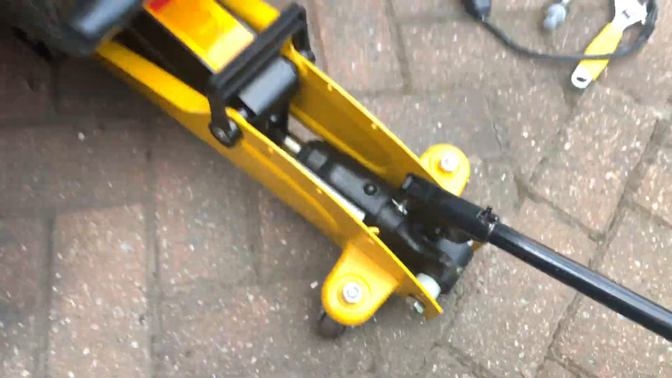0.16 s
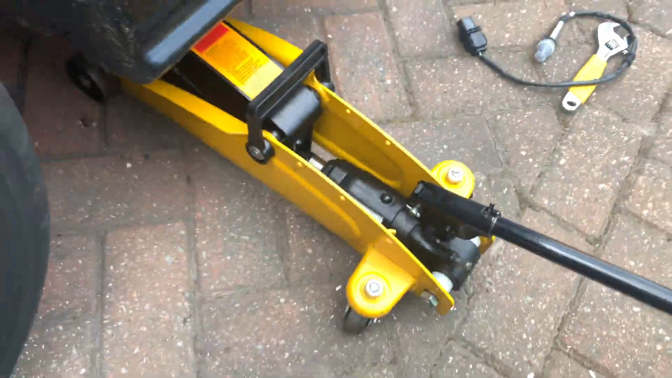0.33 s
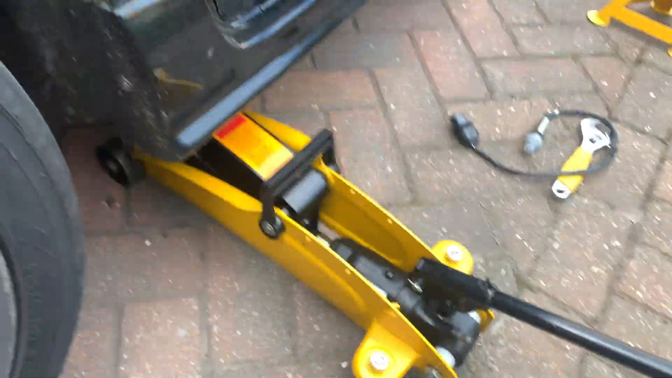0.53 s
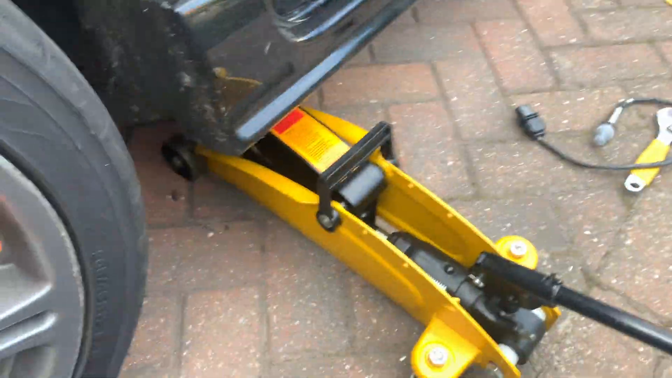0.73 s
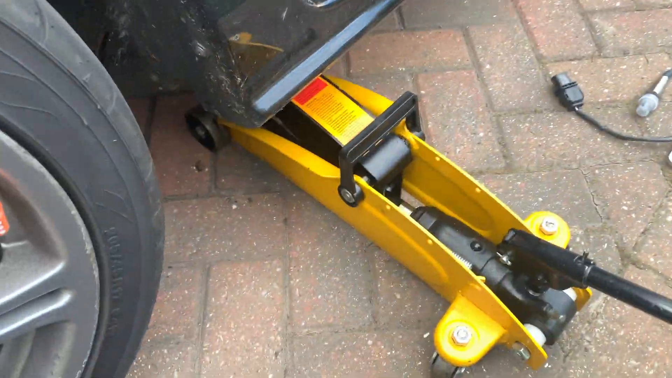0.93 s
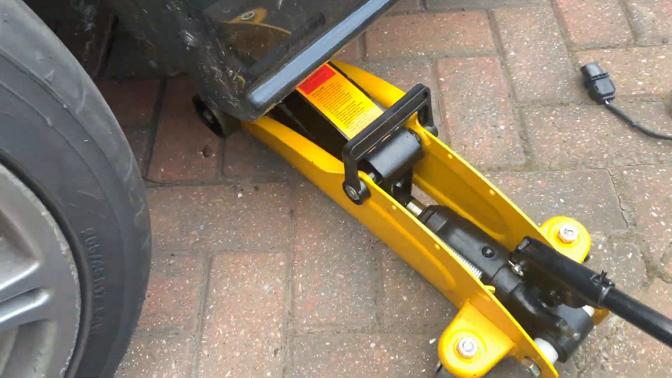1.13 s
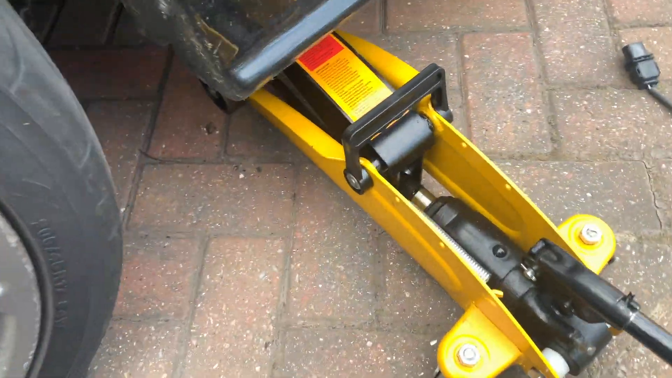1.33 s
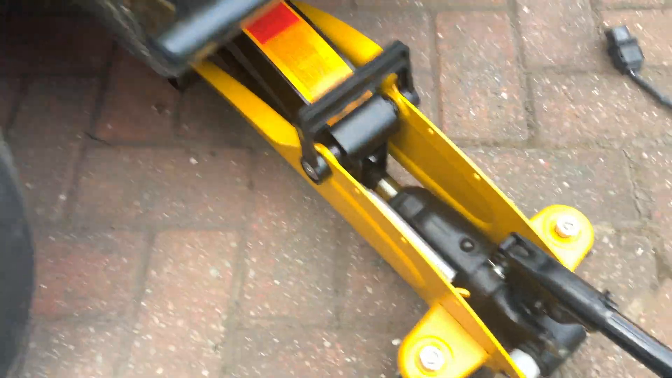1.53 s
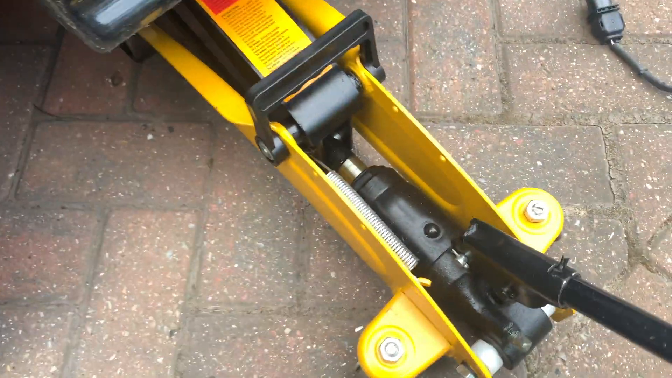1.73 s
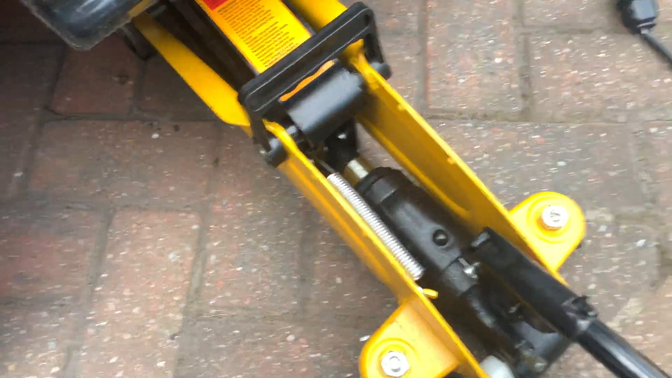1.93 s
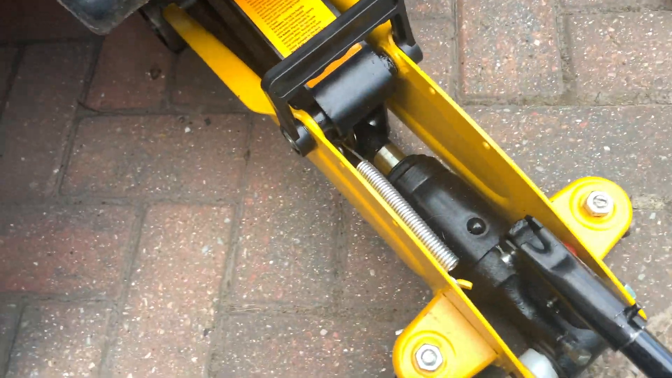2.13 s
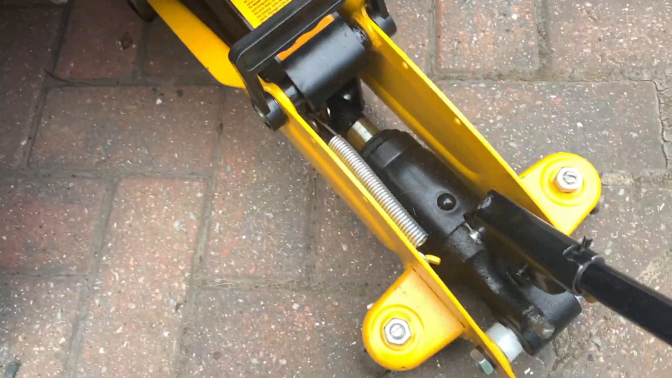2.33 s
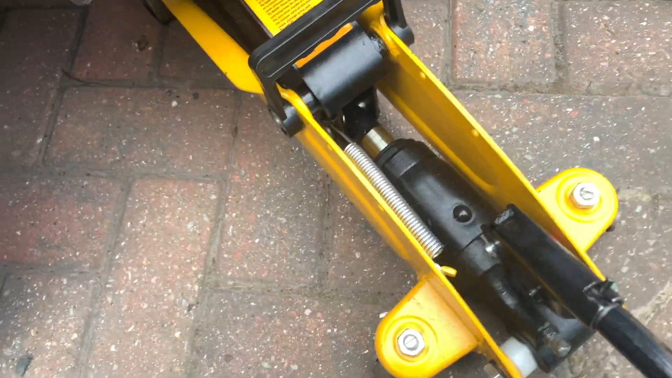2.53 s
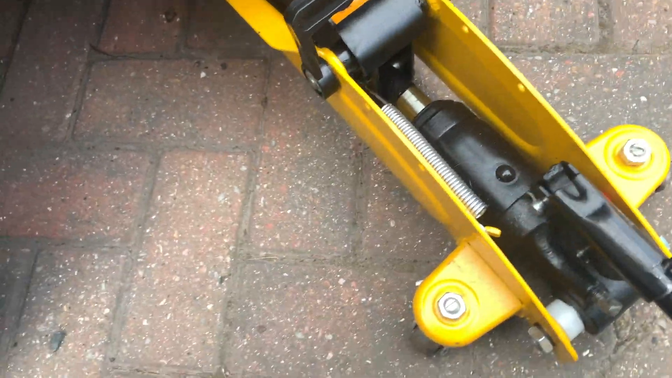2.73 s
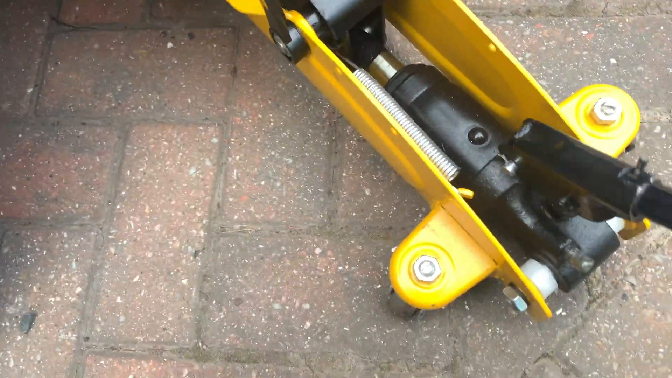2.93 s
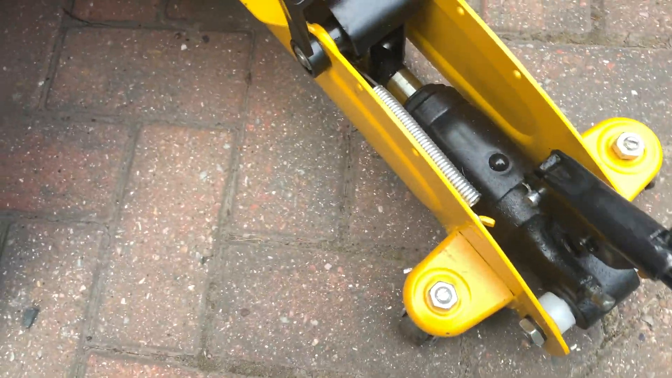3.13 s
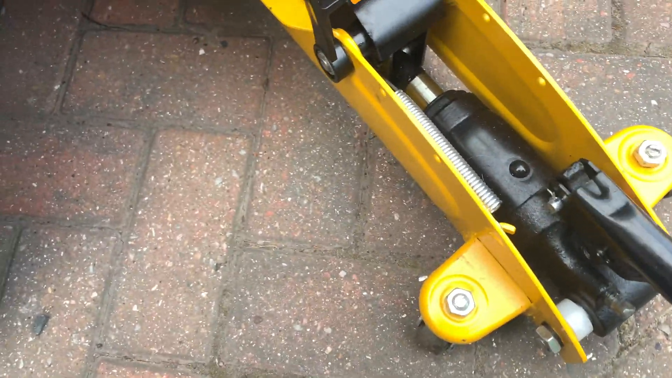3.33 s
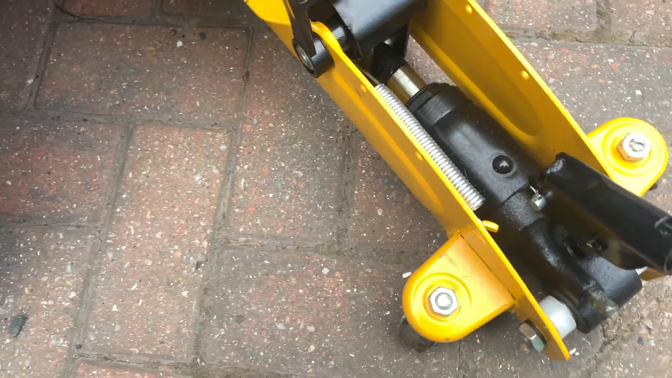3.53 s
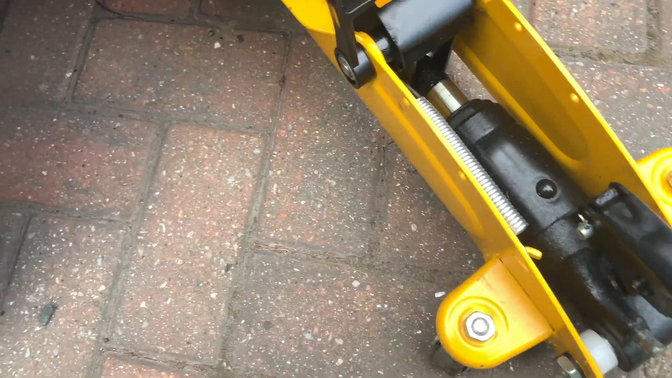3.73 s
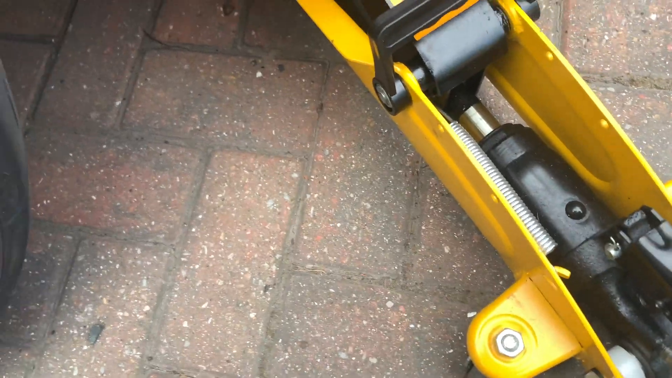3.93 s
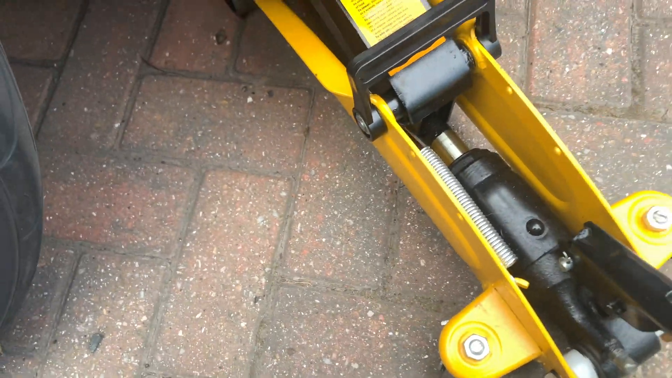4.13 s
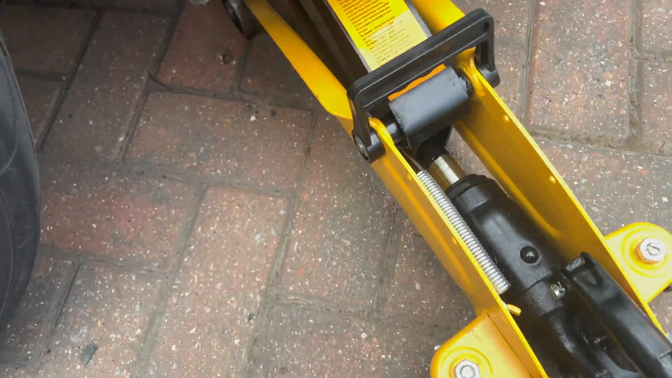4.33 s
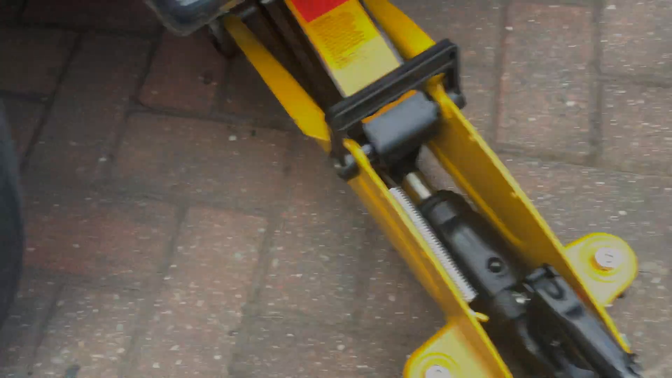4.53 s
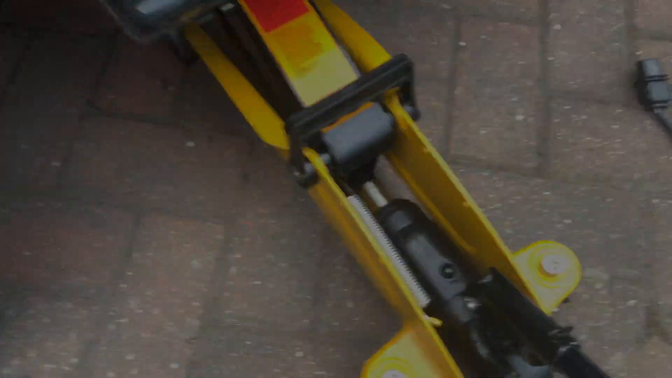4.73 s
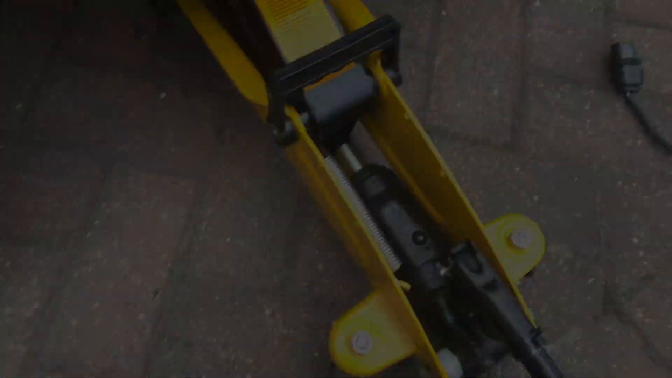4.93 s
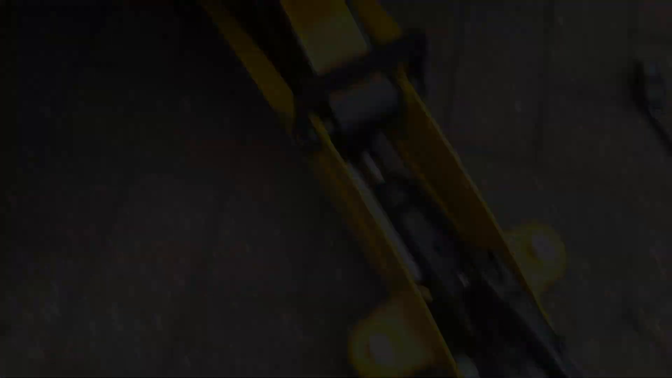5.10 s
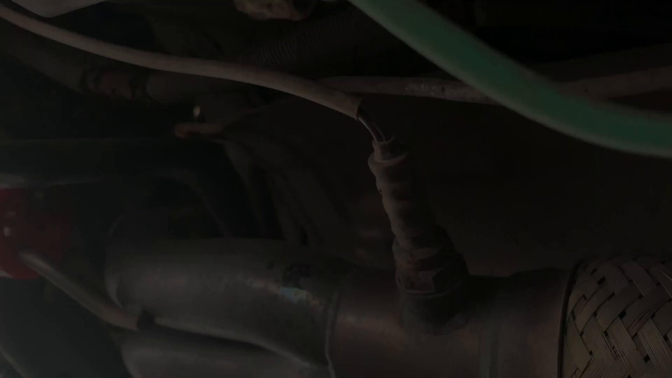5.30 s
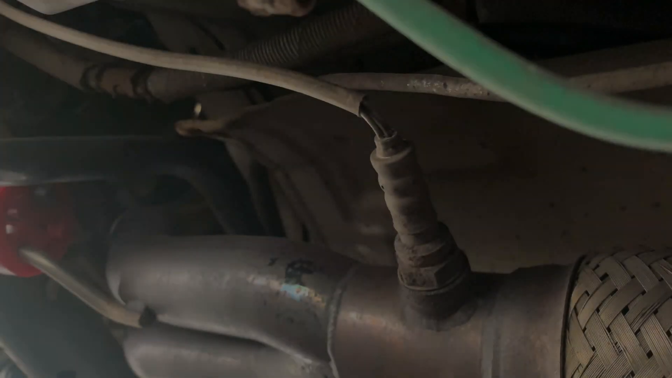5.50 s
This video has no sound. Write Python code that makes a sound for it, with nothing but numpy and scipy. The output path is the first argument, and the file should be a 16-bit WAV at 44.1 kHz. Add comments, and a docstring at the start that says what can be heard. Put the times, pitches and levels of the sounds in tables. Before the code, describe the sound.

A close, dry stereo outdoor sound of a steel trolley jack on block paving. For the first 1.5 s there is only low, uneven wind noise, soft bumps, a thin sliding hiss and a few faint metal ticks. At about 1.5 s pumping begins: six strokes, starting near 1.5, 2.1, 2.8, 3.3, 3.9 and 4.4 s. Each upstroke is a loose, gritty rattle of pins and links, swelling into a tight group of hard, bright clacks, with brief ringing from the handle tube. The frame rumbles beneath, with dull knocks on the paving between roughly 1.8 and 3.1 s. From 3.6 s wind buffets the microphones more strongly with deep, soft thumps. A steady fade starts near 4.45 s, shrinking the last, weaker stroke and its clacks around 4.8 s, reaching silence about 5.26 s. After 5.33 s a very faint low rumble rises again.

```python
"""A steel trolley jack is pumped fast on a paved drive, amid low wind noise at two spaced microphones.
At first sliding hiss and faint clacks are heard; from about 1.5 s six strokes make loose pins and links
clack and chatter, excite the short modes of the frame and the long ones of the handle tube, and make
the frame rumble and knock on the paving. From 3.6 s the wind is stronger. Gain ramps fade the sound
to silence near the end, then a faint rumble rises again."""
import sys
import numpy as np
from scipy import signal
from scipy.io import wavfile
from scipy.ndimage import map_coordinates

SR = 44100
rng = np.random.default_rng(int(sys.argv[2]) if len(sys.argv) > 2 else 0)


def wrap_up_sound(samples):
    """Save the sound to the file named by the first command line argument, as 16-bit audio."""
    columns = np.atleast_2d(samples).T
    # keep every value between -1 and 1, then stretch to whole-number steps
    tamed = np.clip(columns, -1, 1)
    steps = np.round(tamed * 32767).astype(np.int16)
    wavfile.write(sys.argv[1], SR, steps)


N = 245195  # length [samples]
OPPOSED = np.array([[1], [-1]])  # left and right in opposite sign


def amp(db):
    """Decibel law: 20 dB is a factor of ten in amplitude."""
    return 10 ** (np.asarray(db) / 20)


def rms_one(x):
    """Normalisation to unit root-mean-square amplitude."""
    return x / np.sqrt(np.mean(x ** 2) + 1e-20)


def in_time(rows):
    """Linear interpolation of a curve in time, one value per sample."""
    s, *columns = np.transpose(rows)
    return [np.interp(np.arange(N) / SR, s, c) for c in columns]


def at_hz(points, hz):
    """Interpolation of a spectrum on a logarithmic frequency axis."""
    point_hz, values = np.array(points).T
    return np.interp(np.log(hz), np.log(point_hz), values)


def drift(rate):
    """Slow random modulation: Gaussian knots, rate per second, joined by lines; spread about 1."""
    knots = rng.standard_normal(int(N / SR * rate) + 3)
    return map_coordinates(knots, [np.arange(N) * rate / SR], order=1) * np.sqrt(3 / 2)


def ring(x, hz, t60):
    """Damped resonance: a two-pole mode with zeros that restrain it far below and above its pitch."""
    r, w = amp(-60 / (t60 * SR)), 2 * np.pi * hz / SR
    edge = .5 / np.sin(w / 2 + .3)
    return signal.lfilter([edge, 0, -edge], [1, -2 * r * np.cos(w), r * r], x + 1e-18)


def band(x, low_hz, high_hz):
    """Band-pass filtering with a Butterworth response."""
    sos = signal.butter(2, [low_hz, high_hz], "band", fs=SR, output="sos")
    return signal.sosfilt(sos, x + 1e-18)


def place(times, bursts, gains):
    """Superposition: one scaled burst is added at each moment."""
    size = bursts.shape[-1]
    out = np.zeros((2, N + size))
    for s, burst, gain in zip(times, bursts, gains):
        start = round(s * SR)
        out[:, start:start + size] += gain * burst
    return out[:, :N]


def rebounds(shape, per_s, spread_db, fade_s):
    """Repeated impact: uneven random touches, each decaying exponentially with time constant fade_s."""
    sizes = amp(spread_db * np.minimum(rng.exponential(1, shape), 2))
    sizes = sizes * (rng.random(shape) < per_s / SR)
    sizes[..., 0] = 1.6 * amp(spread_db * 2)  # the first touch is the hardest
    return signal.lfilter([1], [1, -np.exp(-1 / (fade_s * SR))], sizes) / amp(spread_db * 2)


# Wind noise before its modulation: (time [s], level [dB])
WIND_LEVEL = [(0, -54.5), (.08, -50.5), (.34, -57.5), (.37, -52), (.94, -60.5), (1.3, -54), (1.86, -55.5),
              (2.07, -52), (2.72, -53), (3.0, -54), (3.3, -48), (3.62, -26.5), (3.7, -38.5), (4.3, -35.5),
              (4.55, -35.5), (5.2, -40.5), (5.4, -62.5), (5.56, -55)]


def wind():
    """Turbulent pressure noise: lumpy low bands, partly incoherent between spaced microphones."""
    level_db, = in_time(WIND_LEVEL)
    mid, side, upper, other = rng.standard_normal((4, N))
    deep = rms_one(band(mid, 44, 100)) + 0.49 * rms_one(band(side, 30, 109.8)) * OPPOSED
    deep = amp(2.0 * drift(14)) * deep
    colour = signal.butter(1, 220, fs=SR)
    upper, other = [rms_one(signal.lfilter(*colour, band(v, 110, 250))) for v in (upper, other)]
    upper = amp(-6.5 + 3 * drift(25)) * (upper + 0.25 * other * OPPOSED)
    return amp(level_db) * (deep + upper)


# Sudden low bumps: (time [s], level before its envelope [dB], reference pitch of the glide [Hz])
LOW_BUMPS = [(0.079, -42.5, 137), (0.36, -34, 110), (0.511, -41.5, 128), (0.683, -39.5, 69.4),
             (1.314, -41, 71), (3.598, -19, 158), (3.654, -21.5, 187.5), (3.853, -19.5, 70.3),
             (4.06, -24.5, 204), (4.226, -20.5, 191.4), (4.317, -20.5, 134), (4.447, -23, 89),
             (4.522, -19.5, 131)]


def bumps():
    """Falling-frequency transients: decaying low swings with a brief overtone, slightly out of phase."""
    s, level_db, hz = np.transpose(LOW_BUMPS)
    t = np.arange(4000) / SR
    glide = 0.84 + 1.0 * np.exp(-t / 0.0069)
    phase = 2 * np.pi * np.cumsum(hz[:, None] * glide, axis=1) / SR
    offset = rng.normal(0, 0.14, (len(s), 1, 1)) * OPPOSED
    overtone = 0.28 * np.exp(-t / 0.06) * np.sin(2.2 * phase[:, None])
    swings = np.sin(phase[:, None] + offset) + overtone
    envelope = (1 - np.exp(-t / 0.00049)) * np.exp(-t / 0.022)
    return place(s, swings * envelope, amp(level_db))


RISE_S, SETTLE_DB_PER_S = .015, 220  # onset and decay of the stroke envelope
# Pump strokes: (handle starts up [s], is raised [s], is down again [s], vigour [dB])
PUMP_STROKES = [(1.492, 1.631, 1.97, -2), (2.087, 2.281, 2.54, 3), (2.758, 2.903, 3.18, -0.3),
                (3.281, 3.467, 3.68, -1.5), (3.918, 4.06, 4.36, -4), (4.411, 4.618, 5.4, -10.5)]


def working(down_share):
    """Envelope of driven motion: quick rise, hold, exponential decay; the way down takes a share."""
    t = np.arange(N) / SR

    def held(until):
        return amp(-SETTLE_DB_PER_S * np.clip(t - until, 0, 1))

    total = 0
    for start, raised, end, vigour_db in PUMP_STROKES:
        rise = np.clip((t - start) / RISE_S, 0, 1)
        hold = (1 - down_share) * held(raised) + down_share * held(end)
        total = total + amp(vigour_db) * rise * hold
    return total


def rumble():
    """Forced vibration: the frame shakes on the paving under each stroke, nearly alike left and right."""
    mid, side = [rms_one(band(v, 48, 210)) for v in rng.standard_normal((2, N))]
    lumps = amp(-42 + 3.5 * drift(30))
    return lumps * working(down_share=0.99) * (mid + .3 * side * OPPOSED)


# Knocks of the frame on the paving: (time [s], level [dB])
FRAME_KNOCKS = [(1.821, -20.5), (2.346, -22.5), (2.395, -24.5), (2.445, -23), (2.874, -24.5), (2.975, -19),
                (3.065, -17.5)]
# Low modes of the frame: (frequency [Hz], relative level [dB], t60 [s])
LOW_MODES = [(143.7, -0.5, 0.14), (219.7, -1, 0.14), (424.4, -12, 0.15), (522, -13, 0.25)]


def thuds():
    """Modal excitation by a soft push: low modes ring, each with a chance phase and strength."""
    s, blow_db = np.transpose(FRAME_KNOCKS)
    t, out = np.arange(12000) / SR, 0
    chance = rng.standard_normal((len(s), len(LOW_MODES), 2))
    for k, (hz, level_db, t60) in enumerate(LOW_MODES):
        tones = np.sin(2 * np.pi * (hz * t + chance[:, k, :1]))
        rings = tones * amp(-60 * t / t60) * (1 - np.exp(-t / 0.01225))
        # one tone per knock, alike in both channels
        out = out + place(s, rings, amp(blow_db + level_db + 2.2 * chance[:, k, 1]))
    return out


# Left-right likeness: (frequency [Hz], correlation [0 to 1])
COHERENCE = [(300, 0.071), (800, 0.093), (2000, 0.33), (5000, 0.037)]


def spread(pair, hz):
    """Interchannel coherence: sum and difference of two unrelated signals give a set likeness."""
    alike = np.clip(at_hz(COHERENCE, hz), 0, 1)
    return np.sqrt(1 + alike) * pair[0] + np.sqrt(1 - alike) * pair[1] * OPPOSED


SLIDE_DB, PUSH_SHARE = -3, 0.25  # added hiss under a stroke; its share on the way down
BRIGHTEN = 0.52  # louder sliding is brighter: dB per octave up to 4 kHz for each dB of level
# Sliding hiss before its swell under a stroke: (time [s], level [dB])
SCRAPE_LEVEL = [(0, -62), (.45, -58), (.8, -67), (.94, -62.5), (1.05, -57.5), (1.39, -60.5), (1.41, -57),
                (1.49, -49), (1.55, -51.5), (1.9, -54.5), (2.7, -56.5), (3.9, -55), (4.4, -53),
                (5.2, -56.5), (5.3, -70.5), (5.56, -77)]
# Spectrum of the hiss: (frequency [Hz], relative density [dB])
SCRAPE_SPECTRUM = [(300, -7), (603, 3.5), (689, -2), (1660, -1), (2650, -7), (3890, -7.5), (14000, -40),
                   (16000, -69.5)]


def scrape():
    """Friction noise: sliding hiss with fine ticks, fluctuating from band to band."""
    level_db, = in_time(SCRAPE_LEVEL)
    moving = working(PUSH_SHARE)
    touches = rebounds(N, per_s=90, spread_db=-2.0, fade_s=0.001)
    ticks = 0.9 + np.minimum(moving + .15, 1) * touches
    white = ticks * rng.standard_normal((2, 2, N))
    out, together = 0, drift(26)
    brighter_db = BRIGHTEN * (level_db - level_db.mean())
    edges = 300 * 2 ** np.arange(0, 5.8, .25)  # quarter-octave bands
    for k, (low_hz, high_hz) in enumerate(zip(edges, edges[1:])):
        hz = np.sqrt(low_hz * high_hz)
        patches_db = 2.5 * drift(20) + 1.5 * together
        tilt_db = brighter_db * np.log2(min(hz, 4000) / 1000)
        gain = amp(at_hz(SCRAPE_SPECTRUM, hz) + patches_db + tilt_db)
        out = out + gain * spread(band(white[k % 2], low_hz, high_hz), hz)
    return amp(level_db) * (1 + amp(SLIDE_DB) * moving) * rms_one(out)


# Blows that leave the handle ringing: (time [s], level [dB], added level of modes above 2 kHz [dB])
HANDLE_BLOWS = [(1.227, -50, -5), (1.51, -34.5, 2), (1.611, -29, -22.5), (1.829, -27, 0.5),
                (2.388, -21.5, -4.5), (2.901, -35, 0.5), (2.9769, -23, 1.5), (3.0753, -21.5, -3),
                (3.533, -12.5, -12.5), (3.652, -21.5, 4), (4.032, -32.5, -4.5), (4.2218, -19, -9.5),
                (4.815, -36, -11)]
# Long modes of the handle tube: (frequency [Hz], relative level [dB], t60 [s])
HANDLE_MODES = [(1791, -9, .24), (5055, -17, .2), (3720, -23, .25), (995, -20, .14), (2662, -24, .2),
                (3080, -23, .13), (4215, -29, .25), (5739, -25, .09)]


def handle():
    """Free vibration: a soft blow sets the tube's modes ringing, with another phase at each microphone."""
    s, blow_db, upper_db = np.transpose(HANDLE_BLOWS)
    t, out = np.arange(12000) / SR, 0
    for hz, level_db, t60 in HANDLE_MODES:
        phase = rng.uniform(0, 2 * np.pi, (len(s), 2, 1))
        tones = np.sin(2 * np.pi * hz * t + phase)
        rings = tones * amp(-60 * t / t60) * (1 - np.exp(-t / 0.0016))
        chance_db = 1.3 * rng.standard_normal(len(s))
        out = out + place(s, rings, amp(blow_db + level_db + (hz > 2000) * upper_db + chance_db))
    return out


def rattle(count):
    """Random impacts of loose links, spread over each upstroke: rows with the columns of the contacts."""
    start, raised, _, vigour_db = np.transpose(PUMP_STROKES)[..., None]
    when, strength, pitch = rng.random((3, len(PUMP_STROKES), count))
    s = start + (raised - start) * (np.arange(count) + when) / count
    same = np.ones(s.shape)
    level_db = -32 + vigour_db + 6 * strength
    treble_db, t60 = -18 * same, .05 * same
    return np.transpose([s, level_db, treble_db, t60, 700 * 5 ** pitch]).reshape(-1, 5)


LOW_DB, LOW_DB_PER_OCTAVE = -4, -5.5  # low modes of a contact favouring 1500 Hz; higher ones have less
LEAD_IN_S, LEAD_IN_DB = .006, -11  # parts graze briefly before the full contact
# Clear metal contacts: (time of full contact [s], drive level [dB], added treble level [dB],
# chatter t60, held to 0.01-0.25 [s], favoured frequency [Hz])
CONTACTS = [(0.071, -40.5, -60, 0.099, 2260), (0.105, -35.5, -19, 0.042, 2440),
            (0.358, -36.5, -41, 0.012, 1080), (0.507, -42, 5, 0.019, 613), (0.678, -46, -40, 0.2, 690),
            (1.163, -42, -9, 0.37, 4460), (1.221, -25, -59, 0.14, 2680), (1.398, -33.5, 0.5, 0.078, 5630),
            (1.499, -31.5, -40, 0.075, 1510), (1.513, -12, -33, 0.11, 1850), (1.549, -25, -17, 0.029, 3020),
            (1.581, -18, -8, 0.0097, 2560), (1.567, -23.5, 9.5, 0.081, 3080),
            (1.611, -5, -8.5, 0.019, 4500), (1.617, -14, 3.5, 0.016, 1900), (1.708, -18, -5.5, 0.14, 2860),
            (1.725, -17.5, -2, 0.085, 2000), (1.791, -4, -4.5, 0.052, 2920), (1.812, -13, -3, 0.14, 2250),
            (1.829, -11.5, -23, 0.12, 1400), (2.087, -22.5, -46, 0.0092, 1440),
            (2.097, -27, -6, 0.007, 4900), (2.106, -23.5, -22, 0.28, 980), (2.146, -24.5, 1, 0.16, 1460),
            (2.171, -32, 1, 0.075, 1540), (2.181, -12.5, -17, 0.09, 6300), (2.198, -9, 1, 0.013, 4763),
            (2.219, -20.5, -12, 0.092, 2610), (2.246, -29, 9, 0.062, 1780), (2.276, -25, 5, 0.016, 4340),
            (2.327, -5, -14.5, 0.11, 4100), (2.377, -2.5, -4, 0.078, 3160), (2.427, -4, -4, 0.089, 2730),
            (2.452, -12, -41, 0.063, 1284), (2.703, -35.5, -18, 0.39, 1680), (2.769, -18, -31, 0.025, 1380),
            (2.829, -44, -20, 0.025, 810), (2.844, -16, 11, 0.022, 1940), (2.868, -11, -12, 0.025, 4440),
            (2.891, -18.5, 10.5, 0.022, 3100), (2.969, -9, -4, 0.088, 2750),
            (3.028, -6.5, -3.5, 0.11, 2990), (3.046, -5, -5, 0.091, 3380),
            (3.066, -6.5, -21.5, 0.052, 1306), (3.287, -35.5, -22, 0.087, 1455),
            (3.321, -35, -32, 0.084, 1490), (3.340, -20.5, -5, 0.035, 5500),
            (3.346, -21.5, -25, 0.093, 1390), (3.363, -15.5, -19, 0.029, 5300),
            (3.393, -20.5, -11, 0.23, 3250), (3.413, -14.5, 11, 0.022, 3240), (3.448, -18, 1, 0.04, 4100),
            (3.457, -12, -9.5, 0.029, 4100), (3.531, -8, -7.5, 0.15, 1800), (3.614, -5, 1, 0.096, 3210),
            (3.625, -3.5, -14, 0.076, 4940), (3.65, -1.5, -8, 0.067, 3100), (3.848, -34, -21, 0.43, 4360),
            (3.92, -22, -20.5, 0.067, 1363), (3.973, -21.5, -2, 0.077, 1850),
            (3.989, -14.5, 7.5, 0.034, 1795), (4.025, -9, -5.5, 0.081, 4600), (4.122, -11, -10, 0.1, 2780),
            (4.181, -7, -2, 0.16, 4900), (4.197, -6.5, -5.5, 0.079, 5600), (4.216, -5, -18, 0.094, 2770),
            (4.418, -31.5, -15, 0.053, 3130), (4.453, -25, -25, 0.041, 2820),
            (4.51, -20.5, -21, 0.051, 1374), (4.528, -23.5, -0.5, 0.046, 1805),
            (4.557, -27, -3, 0.053, 1420), (4.567, -18.5, 2, 0.16, 1995), (4.584, -16, 7, 0.023, 3140),
            (4.609, -14.5, -31, 0.06, 4950), (4.725, -32.5, -20, 0.04, 1500), (4.733, -17, -2, 0.047, 2700),
            (4.767, -11, -1.5, 0.049, 2630), (4.779, -11.5, -12, 0.053, 2590), (4.798, -4, -4, 0.019, 4170),
            (4.813, -10.5, -33.5, 0.073, 1022), (5.061, -28.5, -45, 0.062, 1440),
            (5.13, -26.5, -8, 0.07, 3340)]
# Frame modes: (frequency [Hz], bandwidth, at least 40 used [Hz], relative level [dB])
FRAME_MODES = [(725, 32, -10.5), (1428, 99, -6.5), (3133, 110, -12.5), (4635, 520, -9), (6280, 150, -4.5),
               (9900, 120, -3)]
# Envelope of the dense small modes: (frequency [Hz], relative level [dB])
SMALL_MODE_SPECTRUM = [(420, -15.5), (494, -35.5), (725, -17.5), (1150, -22.5), (1750, -21.5),
                       (4990, -27.5), (5700, -26.5), (10200, -13), (11700, -38), (14700, -5.5),
                       (16000, -33)]


def clacks():
    """Impact excitation: each contact, a decaying run of rebounds, drives small modes and frame modes."""
    s, peak_db, high_db, t60, favoured_hz = np.vstack([CONTACTS, rattle(count=18)]).T
    low_db = LOW_DB + LOW_DB_PER_OCTAVE * np.log2(favoured_hz / 1500)
    t = np.arange(5000) / SR
    touch = 1 - np.exp(-t / .0004)
    shape = touch * amp(-60 * t / np.clip(t60, .01, .25)[:, None])
    shape = shape * (0.087 + rebounds(shape.shape, per_s=260, spread_db=3.0, fade_s=0.0013))
    lead = round(LEAD_IN_S * SR)
    graze = amp(LEAD_IN_DB) * np.linspace(0, 1, lead) * rng.random((len(s), 1))
    shape = np.hstack([graze, shape[:, :-lead]])
    starts = np.round((s - LEAD_IN_S) * SR).astype(int)
    runs = shape * rng.choice([-1, 1], (4, *shape.shape))  # random sign per sample, four versions

    # each part radiates from its own spot, so either channel may lag a little
    lags = np.round(np.abs(rng.normal(0, .00022, (len(s), 4))) * SR).astype(int)
    swaps = rng.integers(0, 2, (len(s), 4))
    bursts = []
    for rows in zip(runs, lags.T, swaps.T):
        bursts.append([np.array([run, np.roll(run, lag)])[::1 - 2 * swap]
                       for run, lag, swap in zip(*rows)])

    def struck(k, hz, width_hz, level_db, scatter_db):
        """Modal response: one resonance under all blows, weighted by their spectra and by chance."""
        low = np.interp(np.log(hz), np.log([1000, 2200]), [1, 0])
        high = np.interp(np.log(hz), np.log([4000, 7000]), [0, 1])
        chance_db = scatter_db * rng.standard_normal(len(s))
        # where the blow lands favours some modes
        favour_db = 11 * np.exp(-(np.log(hz / favoured_hz) / 0.12) ** 2) - 4
        gains = amp(peak_db + low * low_db + high * high_db + chance_db + favour_db)
        drive = np.zeros((2, N + len(t)))
        for start, burst, gain in zip(starts, bursts[k % 4], gains):
            drive[:, start:start + len(t)] += gain * burst
        mode_t60 = np.log(1000) / np.pi / width_hz
        return amp(level_db) * (-1) ** k * width_hz / 100 * ring(drive[:, :N], hz, mode_t60)

    out = 0
    small_hz = np.geomspace(420, 15500, 56) * amp(rng.uniform(-.2, .2, 56))
    for k, hz in enumerate(small_hz):
        level_db = at_hz(SMALL_MODE_SPECTRUM, hz) - 21
        out = out + struck(k, hz, 55 + 0.016 * hz, level_db, scatter_db=2.8)
    for k, (hz, width_hz, level_db) in enumerate(FRAME_MODES):
        out = out + struck(k, hz, max(width_hz, 40), level_db - 30.5, scatter_db=3)
    return band(out, 690, 6830)


def nearby(x, wet_db):
    """Early reflection: the left leads, and paving and car body return short, dull, scattered echoes."""
    lag = 8  # right channel delay [samples]
    direct = np.array([x[0] * amp(6.0), np.pad(x[1], (lag, 0))[:N] * amp(5.0)])
    t = np.arange(4000) / SR
    echoes = band(rng.standard_normal((2, len(t))), 680, 6400) * amp(-60 * t / 0.095) * (t > .002)
    echoes /= np.sqrt(np.sum(echoes ** 2, axis=1, keepdims=True))  # unit energy
    return direct + amp(wet_db) * signal.fftconvolve(x, echoes, axes=1)[:, :N]


def scene():
    """Superposition of the jack, its sliding parts and the wind at the microphones."""
    jack = nearby(clacks() + handle(), wet_db=-8.5)
    sliding = scrape() * amp(OPPOSED * .6)  # left raised and right lowered by 0.6 dB
    return jack + sliding + rumble() + wind() + bumps() + thuds()


FADE_OUT_S, FADE_IN_S = (4.45, 5.262), (5.333, 6.0)  # (start, end) of straight gain ramps
CUTOFF_HZ, CEILING = 16450, .92  # low-pass stopband edge; peak limit before it


def record(dry):
    """Soft saturation rounds the peaks, linear ramps fade out and in, a low-pass cuts the top."""
    t = np.arange(N) / SR
    fade = np.interp(t, FADE_OUT_S, [1, 0]) + np.interp(t, FADE_IN_S, [0, 1])
    rounded = CEILING * np.tanh(dry / CEILING)
    low_pass = signal.cheby2(16, 90, CUTOFF_HZ, fs=SR, output="sos")
    return signal.sosfilt(low_pass, fade * rounded)


dry = scene()
out = record(dry)
wrap_up_sound(out)
```